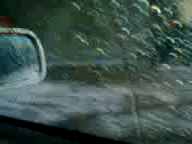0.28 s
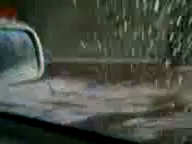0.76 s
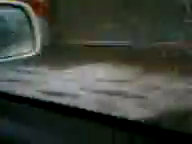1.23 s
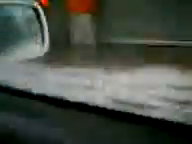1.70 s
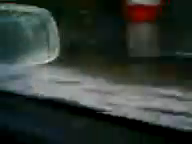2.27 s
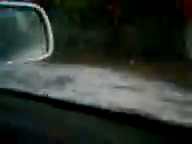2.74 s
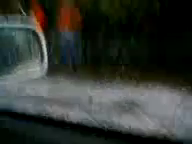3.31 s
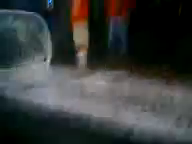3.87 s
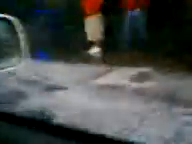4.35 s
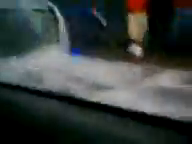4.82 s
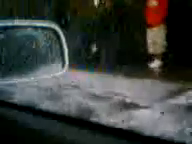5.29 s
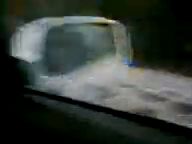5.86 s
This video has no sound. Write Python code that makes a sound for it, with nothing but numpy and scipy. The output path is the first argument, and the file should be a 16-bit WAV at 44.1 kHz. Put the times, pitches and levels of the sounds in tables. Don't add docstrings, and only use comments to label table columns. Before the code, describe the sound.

Inside a parked car, dense hail rattles on roof, panels and side glass. A low window motor hums unsteadily for the first second. Hard stones crack with short bright rings, strongest before about two and a half seconds. The patter thins near three seconds, then continues lighter and uneven. Narrow-band, dull phone sound with overloaded peaks.

```python
import sys
import numpy as np
from scipy import signal
from scipy.fft import rfft, irfft, next_fast_len
from scipy.io import wavfile
from scipy.ndimage import uniform_filter1d

SR = 44100
rng = np.random.default_rng(int(sys.argv[2]) if len(sys.argv) > 2 else 0)


def persist_wave(psi):
    counts = np.round(np.clip(psi, -1, 1) * 32767).astype(np.int16)
    wavfile.write(sys.argv[1], SR, np.atleast_2d(counts).T)


def boost(x):
    u = np.asarray(x, float) / 20
    return 10 ** u


N = 267687

# start_s, peak_db, ring_hz
GLASS_STONES = [(0.2028, -14, 2450), (0.4289, -10, 3326), (0.5966, -3, 2770), (0.7217, -6.5, 2480),
                (0.7581, -11.5, 2790), (0.884, -11, 2800), (0.9288, -1, 2990), (1.1606, -9.5, 2716),
                (1.4026, -1.5, 2710), (1.443, -1.5, 2470), (1.6476, 1, 2113), (1.6661, -8.5, 2475),
                (1.7757, -12.5, 2510), (2.0159, -5, 3100), (2.314, -11, 2670), (2.3699, -6, 2800),
                (3.069, -8, 2420), (3.4856, -11, 2430), (4.1108, -14, 2230), (4.13, -10.5, 2510),
                (4.4887, -5.5, 2560), (4.526, -11, 3130), (4.7633, -4.5, 2860), (5.0074, -6.5, 3046),
                (5.0897, -12.5, 2644), (5.198, -10.5, 2260), (5.3182, -9.5, 3170), (5.867, -9.5, 3150),
                (5.8931, -7.5, 2250), (5.9124, -3.5, 2660)]
# start_s, peak_db
ROOF_STONES = [(0.201, -10.5), (0.324, -10.5), (0.396, -13), (0.43, -17), (0.542, -1), (0.658, -18),
               (0.724, -11.5), (0.796, -22.5), (0.877, -12.5), (1.027, -9), (1.162, -6), (1.244, -7),
               (1.382, 2), (1.401, -9), (1.443, -10.5), (1.473, -12.5), (1.643, -12), (1.712, -20.5),
               (2.016, -20.5), (2.365, -15), (3.567, -16), (3.598, -9), (4.023, -10.5), (4.112, -15),
               (4.289, -10.5), (4.317, -17.5), (4.618, -12.5), (4.672, -6.5), (4.695, -22), (4.906, -8)]


def patter():
    # pitch_hz, level_db (per Hz)
    colour = [(18, -68.5), (30, -32), (69, -19.5), (297, -13), (404, -7.5), (717, -11.5), (1410, -6),
              (1950, -5), (2450, 3), (3400, -3), (3610, -10), (4000, -20), (5200, -35.5), (8800, -120)]
    t = np.arange(N) / SR
    db, weight_db = storm(t)

    glass_db = db + flurries(t, GLASS_STONES, 1) - 2.0
    panel_db = db + flurries(t, ROOF_STONES, 2) - 4.5 + weight_db - 0.5
    open_s = 1
    shut_db = 2.5 * np.clip((open_s - t) / 0.061, 0, 1)
    cabin_db = db + flurries(t, ROOF_STONES, 3) - 13.5 + 1.3 * weight_db + shut_db - 0.6

    hz = np.fft.rfftfreq(4096, 1 / SR)
    below_2000 = 1 / (1 + (hz / 2000) ** 8)
    below_700 = 1 / (1 + (hz / 700) ** 8)
    shares = 1 - below_2000, below_2000 - below_700, below_700

    lags = rng.integers(110, 500, 400)[(t / 0.02).astype(int)]
    small = repeated(strikes(1800, 1.5, 1.5, 0.005), lags, 0.26)
    heavy = repeated(strikes(1500, 1.0, 1.3, 0.012), lags, 0.24)
    air = 0.14 * rng.standard_normal(N)
    drives = small, 0.57 * small + 0.83 * heavy, 0.27 * small + 0.52 * heavy + air

    out = np.zeros(N)
    for drive, share, part_db in zip(drives, shares, (glass_db, panel_db, cabin_db)):
        ring = causal(read(colour, hz) + 10 * np.log10(share + 1e-9))
        out += boost(part_db) * evened(signal.oaconvolve(drive, ring)[:N])
    return patchy(out, 1.64, frames=8, bins=4)


def strikes(per_s, spread_db, clump_db, clump_s):
    hit, sign, size = rng.random((N, 3)).T
    clumps = np.clip(rng.standard_normal(4000), -2.5, 1.3)
    clumps = clumps[(np.arange(N) / (SR * clump_s)).astype(int)]
    level_db = -spread_db * np.log(size + 0.9) + clump_db * clumps
    return (hit < per_s / SR) * np.sign(sign - 0.5) * boost(level_db)


def repeated(x, lags, share):
    n = np.arange(N)
    return x + share * x[n - lags] + share ** 2 * x[n - 2 * lags]


def patchy(x, patchy_db, frames, bins):
    z = signal.stft(x, nperseg=512, noverlap=384)[2]
    patches = rng.standard_normal(z.shape)
    patches = uniform_filter1d(patches, bins, 0)
    patches = evened(uniform_filter1d(patches, frames, 1))
    return signal.istft(z * boost(patchy_db * patches), nperseg=512, noverlap=384)[1][:N]


def storm(t):
    # start_s, patter_db, weight_db
    course = [(0.21, -21.5, 4.5), (0.55, -18.5, 1.5), (0.9, -20, 1.5), (1.08, -21.5, -1), (1.4, -18.5, 0.5),
              (1.8, -19, -1.5), (2.2, -21.5, 1.5), (2.68, -24, 0.5), (2.88, -30, 1), (3.15, -24.5, 2),
              (3.55, -23, 0.5), (3.92, -25, 0), (4.35, -22, -0.5), (4.75, -21.5, 0.5), (5.15, -21.5, 1),
              (5.5, -23, 1), (5.78, -23.5, -1.5), (6.07, -23, -1)]
    s, db, weight_db = np.transpose(course)
    return np.interp(t, s, db), np.interp(t, s, weight_db)


def flurries(t, big, part):
    # start_s, glass_db, roof_db, cabin_db
    gusts = [(0.332, 1, 1.5, 1.5), (.58, 1.5, 2, 1.5), (.7, -3.5, 0, -3), (0.951, 3.5, -3.5, -6.5),
             (1.02, -3.5, -3, 1), (1.13, -3, -1.5, 0.5), (1.19, 4, 2, 0), (1.25, 1, 5.5, -1.5),
             (1.34, -2, -3.5, 3.5), (1.49, -3, 2, -5.5), (1.6, -0.5, -2, -1), (1.83, -4, -0.5, 6),
             (2.5, 4, 2, 3), (2.63, 3, 3.5, -0.5), (3.02, -1.5, 3, -3), (3.1, 4, 2, -0.5),
             (3.32, -2.5, -1.5, 1.5), (3.41, 3, -0.5, 4), (3.59, 2, 1.5, 1), (3.831, 4.5, 0.5, -0.5),
             (4.24, -2, -2, -3), (4.31, 0, -1, 3), (4.42, -4, -2.5, -1), (4.69, 0, 0, 1),
             (4.79, -0.5, 1, 3.5), (4.909, -1, 1.5, 2.5), (5.1, 3, 0, 1), (5.21, 3.5, 3.5, 0),
             (5.3, -0.5, -2, -6.5), (5.71, -2.5, 4, 1.5)]
    steps = rng.standard_normal(800)
    out = 1.4 * np.interp(t / 0.016, np.arange(800), steps)

    # centre in s, height in dB, width in s
    swells = [(row[0], row[part], 0.035) for row in gusts]
    swells += [(row[0] + 0.025, 0.5, 0.027) for row in big]
    swells += [(row[0] - 0.0064, -1.5, 0.0064) for row in GLASS_STONES]
    for s, db, width_s in swells:
        near = slice(max(round((s - 0.15) * SR), 0), round((s + 0.15) * SR))
        out[near] += db * np.exp(-((t[near] - s) / width_s) ** 2)
    return out


def stones():
    # start_s, peak_db, ring_hz
    more_stones = [(0.2708, -4.5, 1870), (0.3274, -11, 2490), (0.4587, -10, 3140), (0.5123, -5.5, 2020),
                   (0.5534, -8, 2750), (0.6685, -6.5, 2740), (0.7765, -8, 2690), (0.819, -6.5, 2480),
                   (0.9474, -3.5, 2710), (0.9886, -10, 2850), (1.1827, -3, 2640), (1.2767, -9.5, 2420),
                   (1.707, -11, 2680), (1.8801, -7, 2240), (2.1546, -9, 2590), (2.4892, -11.5, 2980),
                   (3.3618, -11.5, 2470), (3.4237, -8.5, 2860), (3.5847, -16.5, 2290), (3.963, -13, 3270),
                   (4.1754, -6.5, 2590), (4.2852, -6.5, 3210), (4.4383, -12, 2230), (4.6386, -8.5, 3560),
                   (4.8802, -13, 2780), (5.242, -8.5, 2360), (5.421, -8, 2590), (5.5089, -8.5, 2430),
                   (5.656, -8.5, 3510), (5.9983, -9, 2890)]
    ring_hz, thud_db = 2650, -19

    count = round(10 * N / SR)
    at = rng.random(count) * N / SR
    size, tone, weight = rng.standard_normal((count, 3)).T
    stray_db = storm(at)[0] + 3.5 + size

    # start in s, ring in dB, pitch in Hz, thud in dB
    rows = [(s, db, hz, db + thud_db) for s, db, hz in GLASS_STONES + more_stones]
    rows += [(s, db - 6, ring_hz, db - 4) for s, db in ROOF_STONES]
    rows += zip(at, stray_db, ring_hz + 380 * tone, stray_db + thud_db + 4 * weight)

    out, t = np.zeros(N), np.arange(3000) / SR
    crack = 2.2 * (np.arange(len(t)) == 50)
    dying = boost(-60 * t / 0.041)
    for s, db, hz, panel_db in rows:
        hit, sign = rng.random((len(t), 2)).T
        splinters = (hit < 2400 / SR) * np.sign(sign - 0.5)
        ticks = (crack + splinters) * dying
        ring = resonate(ticks, hz, 1000)
        ring = resonate(resonate(ring, 2900, 2000), 2900, 2600)
        thud = resonate(resonate(ticks, 1600, 1100), 1800, 1500)
        ring = boost(db - 0.74) * ring / abs(ring).max()
        thud = boost(panel_db - 3.5) * thud / abs(thud).max()
        add(out, s, ring + thud)
    return signal.sosfilt(signal.butter(2, 600, "high", fs=SR, output="sos"), out)


def blows():
    # start_s, peak_db, ring_hz
    hardest = [
        (0.6012, -4, 2530),
        (0.884, -3.5, 2544),
        (0.8907, -3, 2213),
        (1.4064, -3.5, 2247),
        (1.445, -3.5, 2615),
        (1.6469, -3.5, 2080),
        (2.0173, -4, 2794),
        (2.369, -3.5, 2480),
        (3.4881, -5, 2616),
    ]
    out, ducking, t = np.zeros(N), np.zeros(N), np.arange(-60, 200) / SR
    swell = np.exp(-(t / np.where(t < 0, 0.0004, 0.0009)) ** 2)
    for s, db, hz in hardest:
        add(out, s + t[0], boost(db) * swell * np.cos(2 * np.pi * hz * t))
        add(ducking, s + t[0], np.sqrt(swell))
    return out, ducking


def winder():
    # start_s, hum_db
    motor = [
        (0.2, -26.5),
        (0.23, -19.5),
        (0.35, -18.5),
        (0.502, -22.5),
        (0.6, -32),
        (0.74, -27.5),
        (0.93, -29),
        (1.0, -51),
    ]
    s, db = np.transpose(motor)
    hum = resonate(rng.standard_normal(N), 405, 80)
    hum = resonate(hum, 405, 130)
    return boost(np.interp(np.arange(N) / SR, s, db, right=-90) - 9.0) * evened(hum)


def evened(x):
    return x / np.sqrt(np.mean(x ** 2) + 1e-20)


def read(points, hz):
    f, value = np.transpose(points)
    return np.interp(np.log(hz + 1), np.log(f + 1), value)


def add(mix, s, sound):
    part = mix[round(s * SR):][:len(sound)]
    part += sound[:len(part)]


def resonate(x, hz, width_hz):
    r = np.exp(-np.pi * width_hz / SR)
    turn = 2 * np.pi * hz / SR
    gain = (1 - r) * 2 * np.sin(turn)
    return gain * signal.lfilter([1], [1, -2 * r * np.cos(turn), r * r], x)


def causal(db):
    log_gain = np.log(boost(np.maximum(np.r_[db, db[-2:0:-1]], -100)))
    return np.fft.ifft(np.exp(np.conj(signal.hilbert(log_gain)))).real[:2048]


def scene():
    knee, sharp = 0.56, 6
    body = patter() + stones() + winder()
    swing = abs(signal.hilbert(body, next_fast_len(N))[:N])
    body = body / (1 + (swing / knee) ** sharp) ** (1 / sharp)
    ring, ducking = blows()
    return (body * (1 - np.minimum(ducking, 1)) + ring)[None]


def band_limit(x):
    return signal.sosfilt(signal.butter(12, 15870, fs=SR, output="sos"), x)


def record(dry):
    # pitch_hz, level_db
    smoother = [(3300, 1.5), (3700, 4), (4000, -1), (4350, -17.5), (4550, -40), (4750, -63), (5200, -100)]
    sampler_hz, start_s, ceiling = 8000, 0.2, 0.71
    t = np.arange(N) / SR
    size = next_fast_len(N)
    hz = np.fft.rfftfreq(size, 1 / SR)

    band = (hz < sampler_hz / 2) / (1 + (20 / (hz + 1)) ** 4)
    low = irfft(rfft(dry * (t > start_s), size) * band, size)[:, :N]
    mirrored = low * (1 + 2 * np.cos(2 * np.pi * sampler_hz * t))
    smoothing = boost(read(smoother, hz)) * (hz < 5600)
    smooth = irfft(rfft(mirrored, size) * smoothing, size)[:, :N]
    smooth = smooth * np.clip((t - start_s) / 0.005, 0, 1)
    return band_limit(np.clip(smooth, -ceiling, ceiling))


dry = scene()
out = record(dry)
persist_wave(out)
```